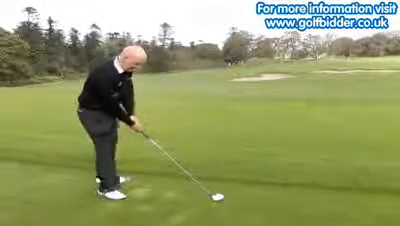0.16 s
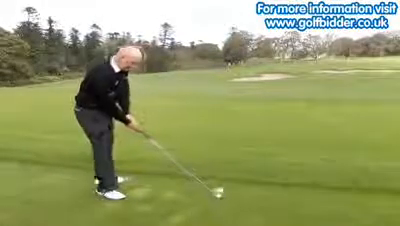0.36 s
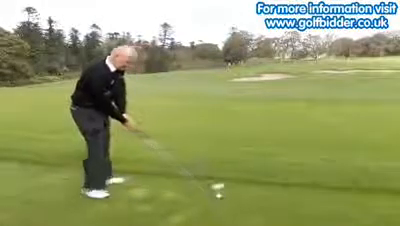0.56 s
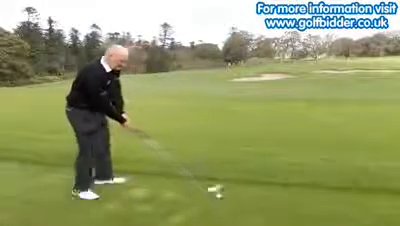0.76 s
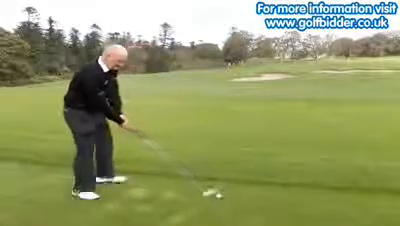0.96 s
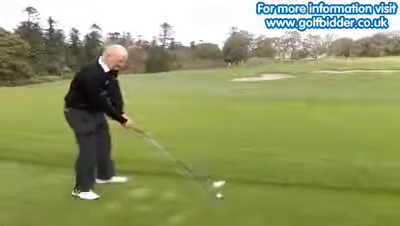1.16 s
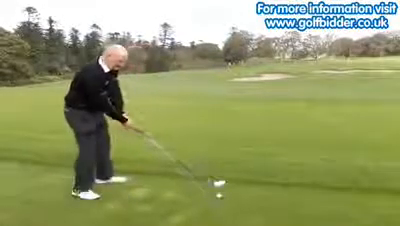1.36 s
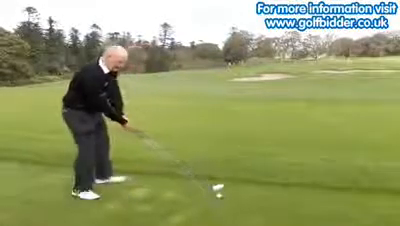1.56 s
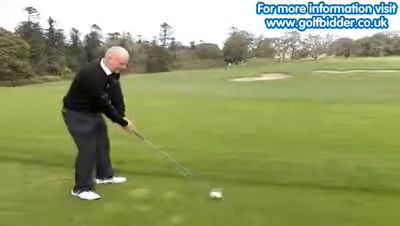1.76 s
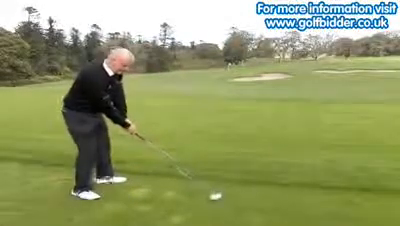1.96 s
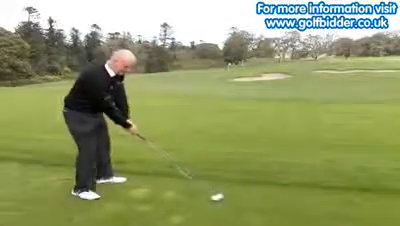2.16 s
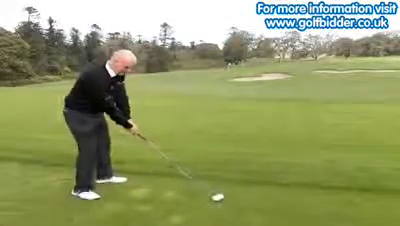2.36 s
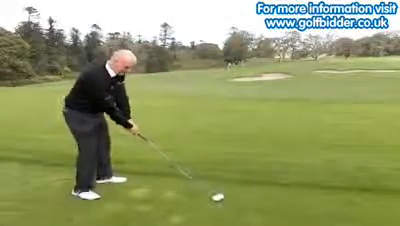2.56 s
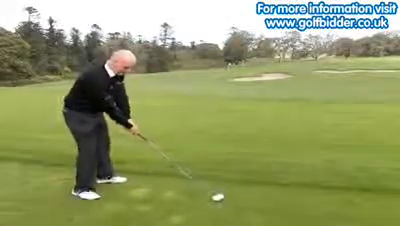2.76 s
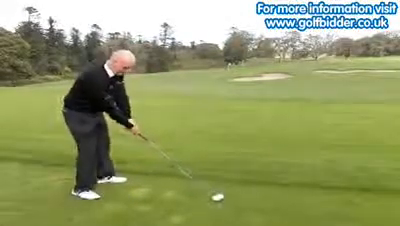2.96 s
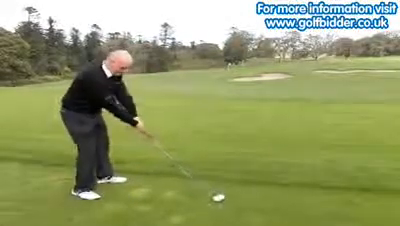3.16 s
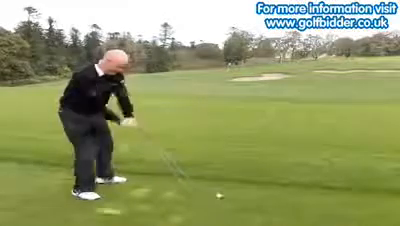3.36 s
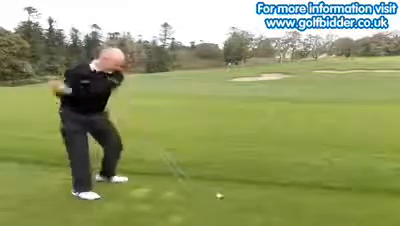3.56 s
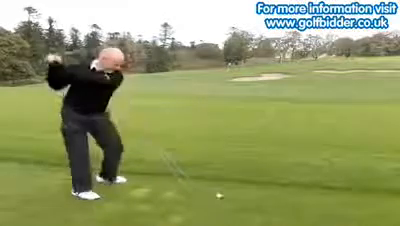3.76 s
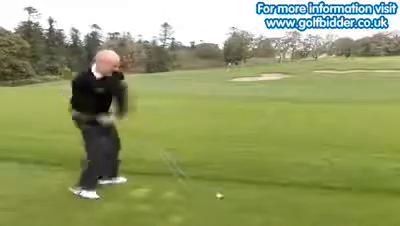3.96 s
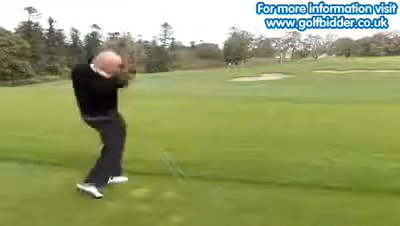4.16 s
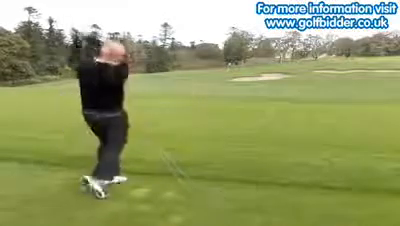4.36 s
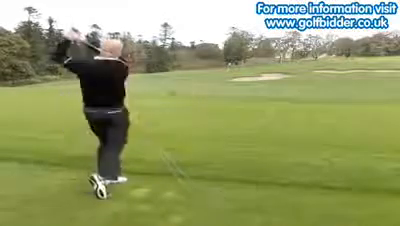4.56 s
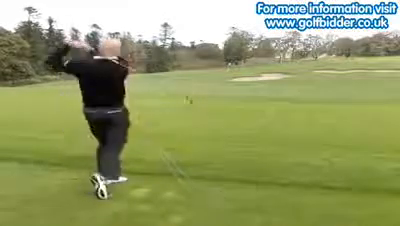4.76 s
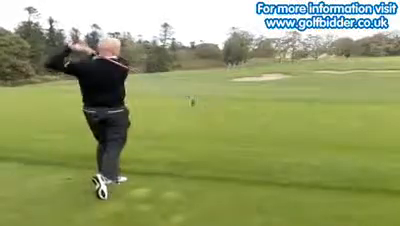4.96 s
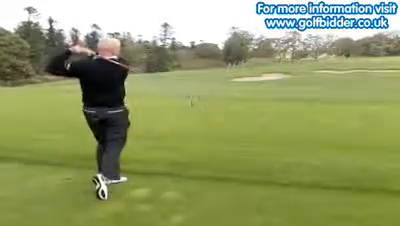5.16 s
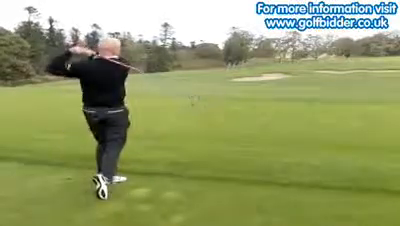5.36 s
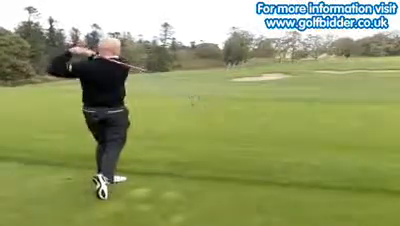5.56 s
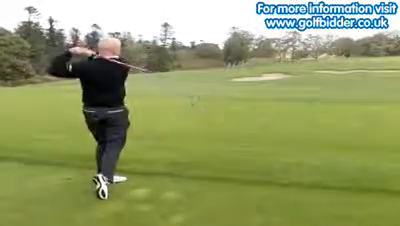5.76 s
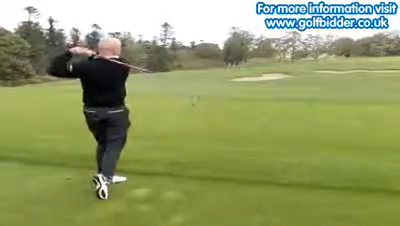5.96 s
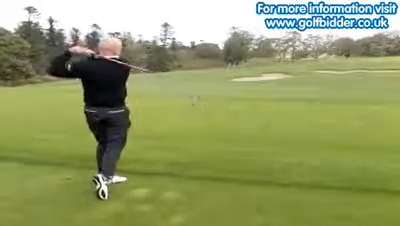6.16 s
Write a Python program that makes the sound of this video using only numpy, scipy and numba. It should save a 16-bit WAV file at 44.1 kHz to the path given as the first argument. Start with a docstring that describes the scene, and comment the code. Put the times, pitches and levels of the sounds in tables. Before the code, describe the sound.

Wind rumbles on the microphone over a soft outdoor breeze, then comes a quick whoosh and the single loud crack of a golf shot.

```python
"""A golfer's iron shot: the shaft whistles, the face cracks against the ball and the sole tears the turf.
The whistle is vortices peeling off the shaft; the crack is a brief push that rings a few low modes.
Thin, glassy tones sizzle around the hit and bits of divot patter down. Behind it are faint rustles, a breeze
over the open fairway and wind buffeting the microphone with rumble and thumps.
The blow overloads the microphone, and the gain control ducks the breeze for a moment."""
import sys
import numpy as np
from scipy import signal
from scipy.fft import rfft, irfft
from scipy.io import wavfile
from scipy.ndimage import uniform_filter1d
from numba import njit

SR = 44100
rng = np.random.default_rng(int(sys.argv[2]) if len(sys.argv) > 2 else 0)


def to_wav(sig):
    """Store sig (one row per channel, or 1-D mono) as 16-bit WAV at the path in sys.argv[1].

    Samples outside -1..1 are clipped; the rate is SR.
    """
    pcm = np.clip(np.atleast_2d(sig), -1, 1) * 32767
    pcm = np.round(pcm).astype(np.int16)
    wavfile.write(sys.argv[1], SR, pcm.T)  # frames by channels


N = 274698
TIME = np.arange(N) / SR
IMPACT_S, TURF_S = 4.234, 0.032  # the moment of impact, and how long the sole then stays in the turf


def undb(db):
    """Decibels to gain."""
    return 10 ** (np.asarray(db) / 20)


def unit(x):
    """Scale to rms 1."""
    return x / np.sqrt(np.mean(x ** 2))


def noise(colour):
    """Noise of rms 1, shaped by an EQ curve of (Hz, dB) points."""
    hz, db = np.transpose(colour)
    bins = np.maximum(np.arange(N // 2 + 1) * SR / N, 1)
    curve = undb(np.interp(np.log(bins), np.log(hz), db))
    return unit(irfft(rfft(rng.standard_normal(N)) * curve, N))


def band(x, hz, kind, order=2):
    """Butterworth filter."""
    return signal.sosfilt(signal.butter(order, hz, kind, fs=SR, output="sos"), x)


def octave_hiss(samples, centre_hz, order):
    """An octave-wide band of noise, rms 1."""
    edges = [centre_hz / np.sqrt(2), centre_hz * np.sqrt(2)]
    return unit(band(rng.standard_normal(samples), edges, "band", order))


def wobble(rate_hz):
    """Smooth random modulation of rms 1, gliding to a new value rate_hz times a second."""
    hold = max(int(SR / rate_hz), 1)
    steps = np.repeat(rng.standard_normal(N // hold + 1), hold)
    return unit(uniform_filter1d(uniform_filter1d(steps, hold), hold)[:N])


def ramp(start_s, length_s):
    """A straight fade from 0 to 1."""
    return np.clip((TIME - start_s) / length_s, 0, 1)


def swell(peak_s, half_width_s):
    """A bell-shaped envelope that peaks at 1."""
    return np.exp(-((TIME - peak_s) / half_width_s) ** 2)


def add(out, start_s, sound):
    """Mix a short sound in at start_s."""
    i = int(start_s * SR)
    out[i:i + len(sound)] += sound[:N - i]


# EQ of the breeze's soft wash. Each row: frequency in Hz, relative level in dB.
WASH_EQ = [(120, -20), (300, -8.5), (500, 2.5), (800, 1), (1200, -4.5), (1800, -10), (2300, -19),
           (3500, -22.5), (4500, -28), (5300, -37), (6500, -40.5), (7600, -69)]
# EQ of the airy hiss at the sides. Each row: frequency in Hz, relative level in dB.
SIDE_HISS_EQ = [(2900, -45), (3400, -17.5), (3900, -4.5), (4800, 0), (7400, -2.5), (8700, 0.5),
                (10000, -10.5), (12000, -35)]


def breeze(level_db=-33, start_dip_db=-4.5, recover_s=1.32, leaves_db=-61, sides_db=-23.5):
    """Air through grass and trees: a wash that starts quieter and fades up, with flickering leaves."""
    bed_db = level_db + start_dip_db * (1 - ramp(0, recover_s))
    wash = noise(WASH_EQ) * undb(bed_db + 0.53 * wobble(25))
    leaves = unit(band(rng.standard_normal(N), [3200, 5000], "band", order=7))
    leaves *= undb(leaves_db + 3.5 * wobble(24))
    sides = noise(SIDE_HISS_EQ) * undb(bed_db + sides_db)
    return wash + leaves + np.array([sides, -sides])  # opposite polarity spreads the hiss wide


# Gusts hitting the microphone. Each row: start in seconds, length in seconds, rumble in dB, eddies in dB.
GUSTS = [(0.032, 0.17, -18, -31.5), (1.041, 0.46, -22, -35), (1.727, 0.42, -20, -25),
         (2.562, 0.29, -23, -23.5), (3.307, 0.49, -22, -32), (3.924, 0.085, -18.5, -32),
         (4.43, 0.11, -25.5, -28.5), (4.727, 0.45, -21, -29), (5.725, 0.24, -23, -34.5)]


def gusts(rumble_start_db=-19.5, eddies_start_db=-27, attack_s=0.034, release_s=0.026):
    """Envelopes for rumble and eddies: a slowly easing wind plus gusts that rise, hold and die away."""
    rumble_power = undb(rumble_start_db - 1.34 * TIME) ** 2
    eddy_power = undb(eddies_start_db - 0.44 * TIME) ** 2
    for start_s, length_s, rumble_db, eddies_db in GUSTS:
        shape = ramp(start_s, attack_s) * np.exp(-np.maximum(TIME - start_s - length_s, 0) / release_s)
        rumble_power += (shape * undb(rumble_db)) ** 2
        eddy_power += (shape * undb(eddies_db)) ** 2
    return np.sqrt(rumble_power), np.sqrt(eddy_power)


# Bass-heavy EQ of wind on the microphone. Each row: frequency in Hz, relative level in dB.
WIND_EQ = [(12, -35), (20, 2.5), (59, 2), (123, -9.5), (400, -27.5), (520, -35.5), (880, -120)]


def wind(split_hz=120, flutter_db=0.88, small_hz=300, small_boost_db=8):
    """Large eddies rumble on the microphone; small ones flutter on top when a gust hits."""
    rumble_gain, eddy_gain = gusts()
    rumble = unit(band(noise(WIND_EQ), split_hz, "low", order=4))
    rumble /= np.sqrt(uniform_filter1d(rumble ** 2, SR // 8))  # even churn, so the gusts set its strength
    eddies = unit(band(noise(WIND_EQ), split_hz, "high", order=4) * undb(flutter_db * wobble(30)))
    # the smallest eddies grow with the square of the gust, so hard buffets sound brighter
    small = unit(band(noise(WIND_EQ), small_hz, "high", order=6))
    return rumble * rumble_gain + eddies * eddy_gain + small * eddy_gain ** 2 * undb(small_boost_db)


# Single eddies thumping the microphone. Each row: peak time in seconds, peak level in dB, pitch in Hz.
EDDY_THUMPS = [(.074, -6, 42), (.133, -9, 20), (.51, -14, 60), (1.474, -9, 40), (2.737, -12, 150),
               (2.779, -14, 120), (4.802, -10, 30), (5.085, -9, 65)]


def thumps():
    """Each eddy is one swing of pressure with a dip on either side."""
    out = np.zeros(N)
    for peak_s, db, hz in EDDY_THUMPS:
        offset_squared = (np.pi * hz * (TIME - peak_s)) ** 2
        out += undb(db) * (1 - 2 * offset_squared) * np.exp(-offset_squared)
    return out


# Quiet brushes of club on grass and of a sleeve, plus one faint, slow swell of high hiss.
# Each row: peak time in seconds, half width in seconds, level in dB, centre in Hz.
RUSTLES = [(.205, .016, -45, 1300), (0.854, .013, -45, 2500), (1.0, .6, -67, 4500),
           (1.033, .012, -57, 4000), (3.44, .018, -55, 4200)]


def rustles():
    """Soft swells of hiss before the swing."""
    out = np.zeros(N)
    for peak_s, half_width_s, db, hz in RUSTLES:
        out += octave_hiss(N, hz, order=5) * undb(db) * swell(peak_s, half_width_s)
    return out


# Bits of grass and soil tearing loose and landing. Each row: start in seconds, level in dB, centre in Hz.
DIVOT_CRUMBS = [(4.2225, -25, 3800), (4.2555, -26, 3300), (4.3165, -29, 1300), (4.333, -34, 1300),
                (4.3435, -41, 3200)]


def divot(tear_db=-29, spray_db=-44, spray_t60_s=0.49, grain_db=-3.5, crumb_t60_s=0.067):
    """Roots rip while the sole is in the turf; crumbs patter and a spray of grass thins out."""
    grains = rng.standard_normal(N) * undb(grain_db * wobble(500))
    grass = unit(band(grains, [2400, 4700], "band", order=6))
    tearing = undb(tear_db) * (1 - ramp(IMPACT_S + TURF_S, 0.0053))
    spray = undb(spray_db - 60 * np.maximum(TIME - IMPACT_S, 0) / spray_t60_s)
    out = grass * ramp(IMPACT_S, .003) * (tearing + spray)
    decay = undb(-60 * TIME[:SR // 10] / crumb_t60_s)
    for start_s, db, hz in DIVOT_CRUMBS:
        add(out, start_s, octave_hiss(len(decay), hz, order=4) * undb(db) * decay)
    return out


def through_turf(rise_db_per_s, step_db, sag_db_per_s, release_db_per_s):
    """Envelope that swells to impact, steps there, sags while the sole is in the turf, then dies."""
    t = TIME - IMPACT_S
    attack_db = rise_db_per_s * np.minimum(t, 0) + step_db * ramp(IMPACT_S, 0.0049)
    decay_db = sag_db_per_s * np.clip(t, 0, TURF_S) + release_db_per_s * np.maximum(t - TURF_S, 0)
    return undb(attack_db - decay_db)


# EQ of the club head's whoosh. Each row: frequency in Hz, relative level in dB.
WHOOSH_EQ = [(60, 2), (250, 9), (500, 12.5), (1300, 3.5), (2100, -8.5), (3300, -8), (4600, -9.5),
             (5100, -21), (6400, -19), (7000, -40), (8300, -54)]


def head_whoosh(level_db=-11, grain_db=2):
    """The club head tears through air and turf with a grainy hiss."""
    gain = through_turf(rise_db_per_s=302, step_db=-10, sag_db_per_s=70, release_db_per_s=703)
    return unit(noise(WHOOSH_EQ) * undb(grain_db * wobble(600))) * gain * undb(level_db)


def rough_tone(phase, rate_hz):
    """A breathy band of noise that follows a pitch; a faster rate makes it wider."""
    return wobble(rate_hz) * np.sin(phase) + wobble(rate_hz) * np.cos(phase)


# Surges in the whistle as vortices lock in along the shaft.
# Each row: peak time in seconds, half width in seconds, level in dB.
WHISTLE_SURGES = [(4.158, .006, -11.5), (4.177, .008, -12), (4.203, .0035, -6.5), (4.211, .002, -10.5),
                  (4.221, .005, -9.5)]


def shaft_whistle(top_hz=728, steady_db=-17.5, speed_power=2.3, impact_step_db=-8, flutter_db=1.5):
    """The shaft sheds vortices: a surging whistle whose pitch and level ride the speed of the swing."""
    speed = swell(peak_s=4.216, half_width_s=.094)
    steady = speed ** speed_power * undb(steady_db + impact_step_db * ramp(IMPACT_S, .005))
    surges = sum(undb(db) * swell(peak_s, half_width_s) for peak_s, half_width_s, db in WHISTLE_SURGES)
    pitch_hz = top_hz * speed * (1 + .045 * wobble(400))
    phase = 2 * np.pi * np.cumsum(pitch_hz) / SR
    tone = np.sqrt(2) * np.sin(phase) * undb(flutter_db * wobble(330))
    wake = undb(-1) * rough_tone(.9 * phase, 450)  # turbulence roughens the whistle from just below
    inner = undb(-6) * rough_tone(.5 * phase, 480)  # the slower inner shaft hums an octave down
    drag = undb(-10) * rough_tone(2 * phase, 900)  # drag on the shaft beats an octave up
    draught = undb(-9) * unit(band(rng.standard_normal(N), [60, 300], "band"))  # arms and club push air
    return tone * np.hypot(steady, surges) + (wake + inner + drag + draught) * steady


# The low rows are the crack of club on ball; those above 5 kHz are thin, glassy tones around the hit.
# Each row: pitch in Hz, level in dB, seconds to fade by 60 dB.
IMPACT_TONES = [(1130, 3, .011), (1400, 1.5, .011), (1680, 1, .011), (2450, -9, .011), (3120, -6, .012),
                (3550, -6, .012), (4200, -6, .012), (5180, -21, .055), (5580, -25, .08), (6020, -13, .055),
                (6180, -32, .25), (6440, -19, .055), (7300, -26, .2), (7435, -15, .07), (7750, -20, .08),
                (8340, -19, .08)]


def impact_ring(above_hz=0):
    """The crack and its glassy top as decaying sines; above_hz keeps only the higher tones."""
    t = TIME[:SR // 2]
    return sum(undb(db - 60 * t / t60_s) * np.sin(2 * np.pi * hz * t)
               for hz, db, t60_s in IMPACT_TONES if hz > above_hz)


def glassy_sizzle(level_db=-27, grain_db=3):
    """A brief, high, tonal sizzle around the impact: grainy noise played through the glassy tones."""
    grains = rng.standard_normal(N) * undb(grain_db * wobble(990))
    grains = band(grains, [5000, 8400], "band", order=8)
    sizzle = unit(signal.fftconvolve(grains, impact_ring(above_hz=5000))[:N])
    gain = through_turf(rise_db_per_s=700, step_db=8, sag_db_per_s=400, release_db_per_s=1200)
    return sizzle * gain * undb(level_db)


# Hits on the club head: turf, ball, then a clod.
# Each row: start in seconds, level in dB, contact time in milliseconds.
CLUB_HITS = [(4.2325, -11, .7), (4.2338, 10.5, .22), (4.2671, -18, .4)]


def strike():
    """Each hit is a half-sine push into the ring; the shorter the contact, the brighter the crack."""
    out, t_ms = np.zeros(N), 1000 * TIME[:SR // 100]
    for start_s, db, contact_ms in CLUB_HITS:
        push = np.sin(np.pi * np.minimum(t_ms / contact_ms, 1))
        add(out, start_s, undb(db) * signal.fftconvolve(impact_ring(), push / push.sum()))
    return out


def scene():
    """A dry mix on open ground; everything but the breeze's side hiss sits dead centre."""
    background = wind() + thumps() + breeze() + rustles()
    return background + shaft_whistle() + head_whoosh() + strike() + glassy_sizzle() + divot()


@njit
def follow(x, attack_s, release_s):
    """Envelope follower with separate attack and release times."""
    attack, release = 1 / (attack_s * SR), 1 / (release_s * SR)
    envelope, level = np.empty(len(x)), 0.
    for i in range(len(x)):
        level += (abs(x[i]) - level) * (attack if abs(x[i]) > level else release)
        envelope[i] = level
    return envelope


def record(dry, threshold_db=-4.5, ratio=10, ceiling=.88, shelf_hz=8900, shelf_db=-9, cut_hz=16000):
    """The camcorder's gain control ducks, its microphone overloads, and the treble is notched and dulled."""
    level = follow(dry.mean(axis=0), attack_s=0.003, release_s=0.25)
    x = dry * np.maximum(level / undb(threshold_db), 1) ** (1 / ratio - 1)
    x = ceiling * x / (1 + x ** 6) ** (1 / 6)  # soft clip
    x = band(x, hz=[2660, 3040], kind="bandstop")
    x = band(x, shelf_hz, "low", order=14) + undb(shelf_db) * band(x, shelf_hz, "high", order=14)
    return signal.sosfilt(signal.ellip(10, .2, 95, cut_hz, fs=SR, output="sos"), x)


dry = scene()
out = record(dry)
to_wav(out)
```